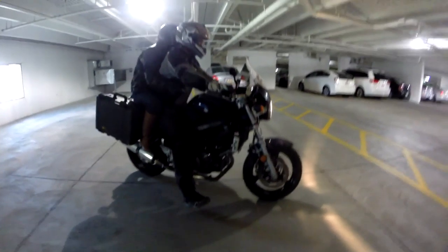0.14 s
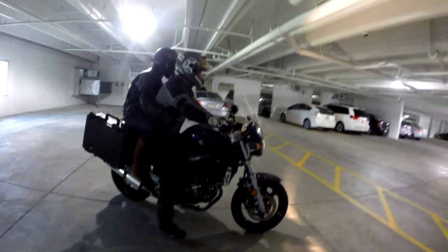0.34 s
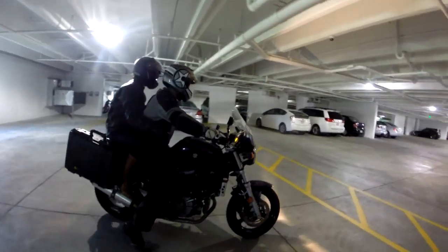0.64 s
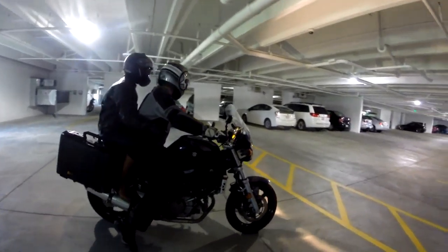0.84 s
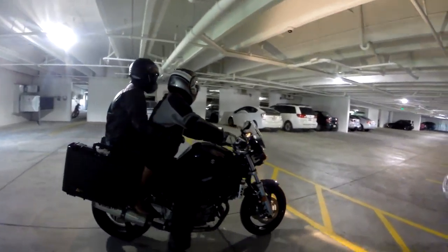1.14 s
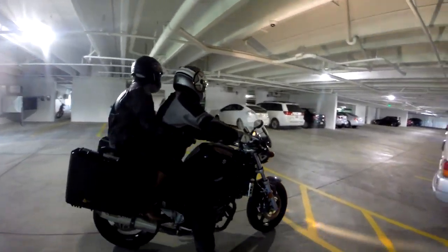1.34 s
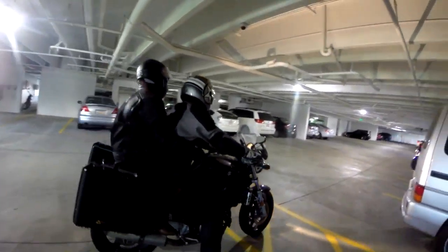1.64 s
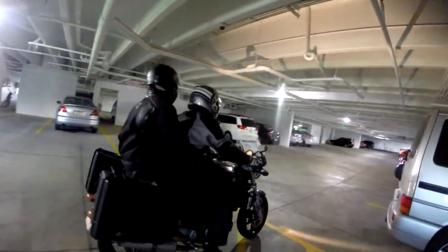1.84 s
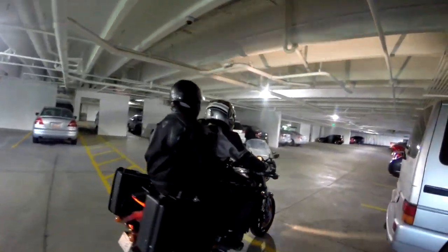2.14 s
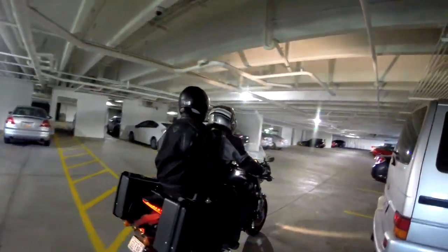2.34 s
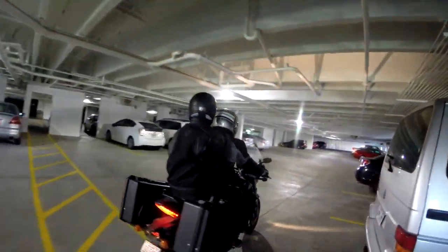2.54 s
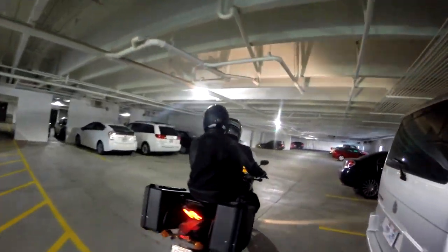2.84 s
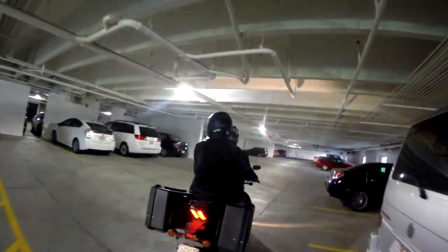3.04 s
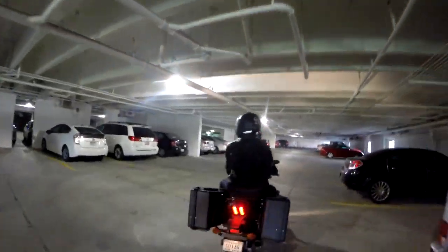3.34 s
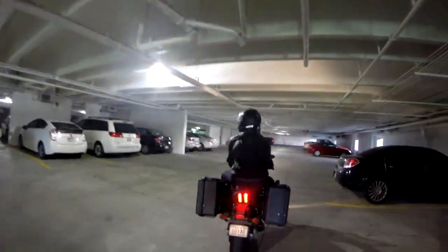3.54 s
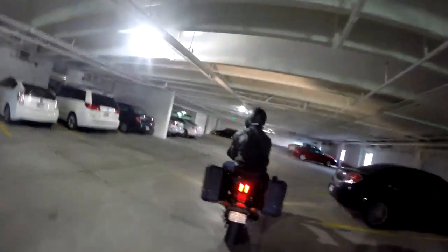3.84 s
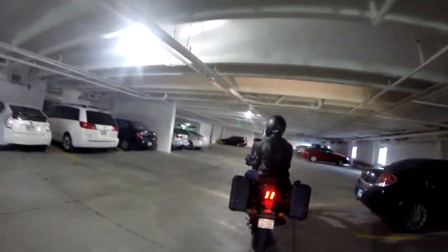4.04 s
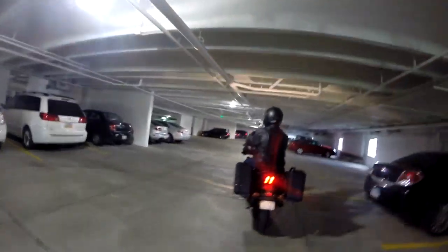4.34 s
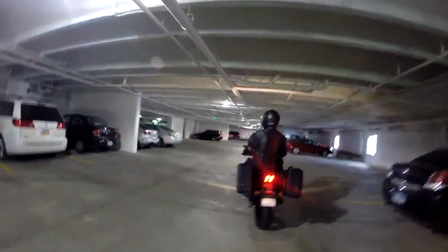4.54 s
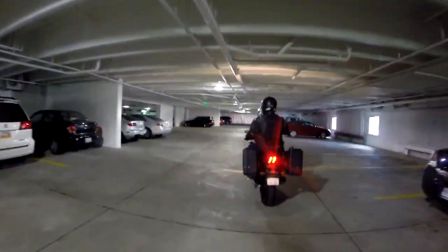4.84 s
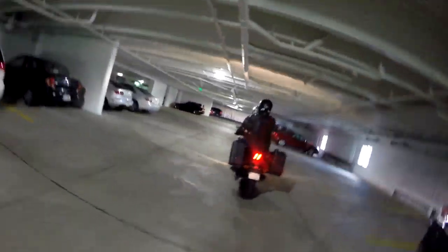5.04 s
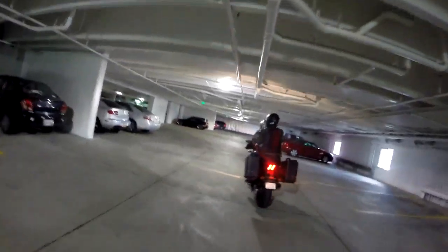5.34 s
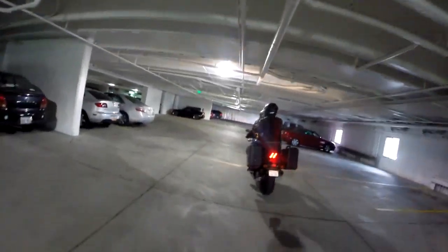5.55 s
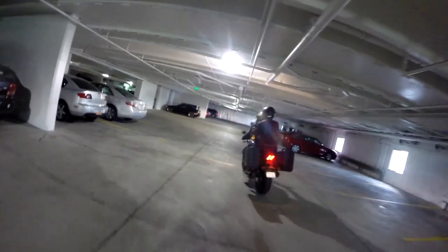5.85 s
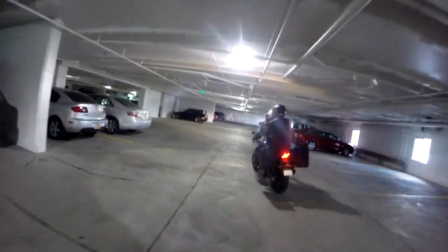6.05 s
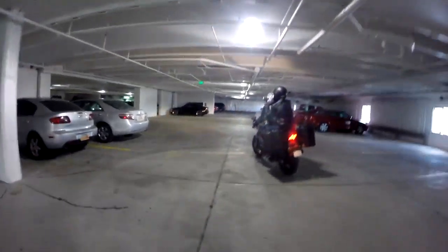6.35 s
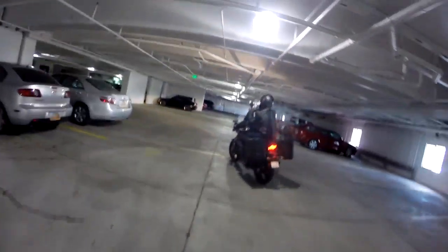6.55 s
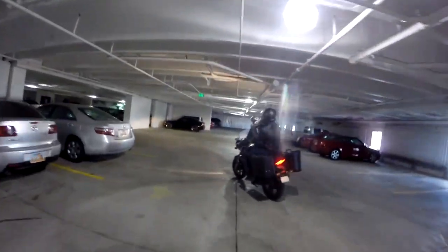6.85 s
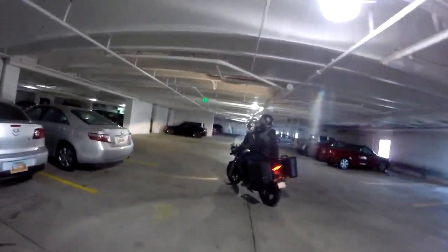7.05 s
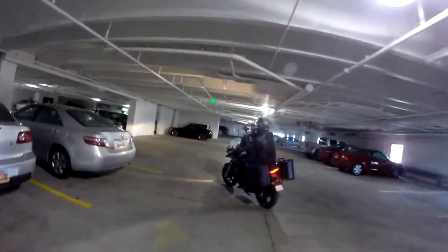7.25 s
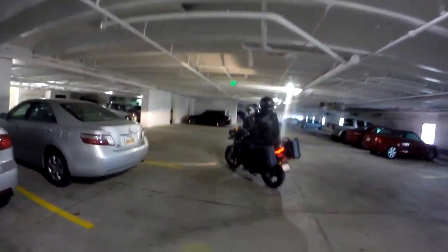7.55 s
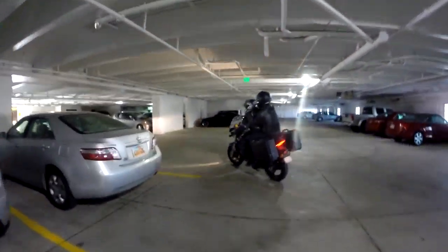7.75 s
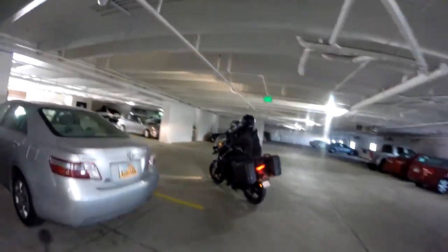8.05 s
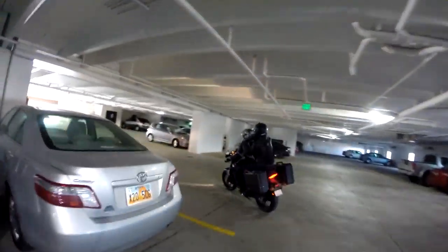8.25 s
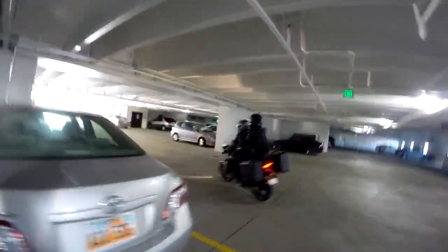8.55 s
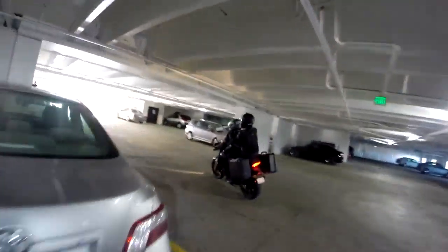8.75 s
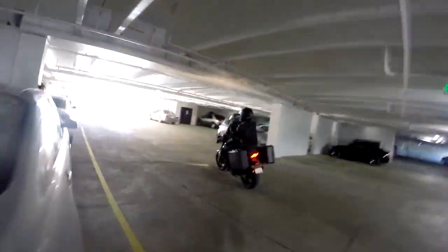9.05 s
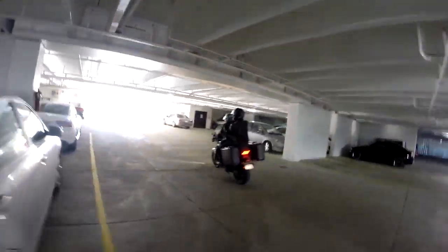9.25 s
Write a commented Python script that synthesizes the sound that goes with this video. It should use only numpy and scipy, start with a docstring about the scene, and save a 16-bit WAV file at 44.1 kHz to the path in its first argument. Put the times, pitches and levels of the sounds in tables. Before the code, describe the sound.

Close plastic clicks and a heavy thump on the camera open over a motorcycle's deep, uneven idle and ticking valves. The revs climb into a hoarse roar as it leaves, sink while coasting, then rise to the end, with low notes blooming off the concrete walls. A carried microphone is buffeted by soft, sub-bass gusts at each stride and clicks throughout.

```python
"""A V-twin motorcycle idles in a concrete garage: firing pulses boom, bark and roar over metal clatter.
From the start the camera carried after it is blown and handled: noise buffets, scrapes, knocks and bumps.
The bike pulls away as its revs climb, with faint rustles of handling from then on.
It coasts round a corner on falling revs, then speeds up again, a thin squeak of filtered noise
passing early in that second climb."""
import sys
import numpy as np
from scipy import signal
from scipy.fft import rfft, irfft
from scipy.io import wavfile
from scipy.ndimage import uniform_filter1d

SR = 44100
rng = np.random.default_rng(int(sys.argv[2]) if len(sys.argv) > 2 else 0)


def transcribe(u):
    """Save the signal u as a 16-bit wav file named by the first command-line argument.

    u: samples, shape (n,) or (channels, n), limited to [-1, 1]; the rate is SR.
    q: integer samples, one column per channel.
    """
    v = np.clip(np.atleast_2d(u).T, -1, 1)
    q = np.round(v * 32767).astype(np.int16)
    wavfile.write(sys.argv[1], SR, q)


N = 414099
TIME = np.arange(N) / SR

# engine speed, dipping as the clutch bites: time_s, speed_hz (four-stroke cycles a second)
ENGINE_SPEED = [(0, 13), (.45, 13.3), (.68, 13.5), (.86, 14.26), (1.45, 13.66), (1.65, 13.3), (1.9, 13.9),
                (2.55, 13.8), (2.76, 13.3), (3.1, 13.3), (3.5, 14.55), (3.75, 16.2), (4.05, 17.3),
                (4.45, 17.9), (5.0, 17.15), (5.55, 14.6), (6.1, 13.44), (7.1, 12.8), (7.75, 14.5),
                (8.1, 15.4), (8.6, 17.3), (9.1, 19.1), (9.39, 20.7)]
# throttle, as the strength of the firings against idling: time_s, throttle_db
THROTTLE = [(0, 1.5), (.9, 2), (3.2, 1.5), (4.0, 7), (4.3, 5.5), (4.75, 6.5), (5.35, 0.5), (6.05, -4.5),
            (6.7, 3.5), (7.15, 2), (7.7, 4.5), (9.0, 7), (9.39, 6.5)]
# how far the bike is from the camera: time_s, distance_m
BIKE_DISTANCE = [(0, 2.5), (3.2, 2.44), (4.3, 2.5), (5.0, 1.5), (5.4, 5), (6.8, 6.2), (8.5, 3.63),
                 (9.39, 3.6)]
# low tone of the exhaust: freq_hz, gain_db
BOOM_COLOUR = [(20, -14.5), (45, -5.5), (68, 2), (81, -1.5), (94, 1), (110, 3.5), (130, 4), (152, -7.5),
               (172, -11.5), (230, -29), (500, -82)]
# midrange of the exhaust: freq_hz, gain_db
BARK_COLOUR = [(100, -31), (180, -7), (220, -4), (275, 1.5), (335, -5), (375, -7.5), (430, -20.5),
               (520, -24.5), (700, -34.5), (980, -26.5), (1300, -33.5), (3000, -74)]
# open end of the silencer, roaring above the bark: freq_hz, gain_db
ROAR_COLOUR = [(250, -33.5), (350, -7), (408, 3), (465, -4), (530, -4), (600, -16), (700, -17), (1000, -47),
               (2000, -64.5)]
# the roar climbs with the throttle and as the pipe swings towards the camera: time_s, level_db
ROAR_LEVEL = [(0, -56.5), (1.4, -52.5), (1.7, -50.5), (2.25, -47.5), (2.6, -50), (2.9, -51), (3.3, -48),
              (3.85, -46), (4.3, -46), (4.72, -43.5), (4.92, -42), (5.15, -48), (5.6, -56), (6.3, -58),
              (7.1, -59), (7.7, -53), (8.4, -49.5), (8.9, -47.5), (9.39, -45)]
# metal of the engine: freq_hz, gain_db
METAL_COLOUR = [(300, 0.5), (750, 1.5), (1000, 1.5), (1250, -4.5), (1570, 2.5), (1830, -3), (2050, 3.5),
                (2450, 1.5), (2800, -3), (3000, -3), (3300, -6), (4650, -8.5), (4900, -7.5), (5050, -3.5),
                (5250, -8), (6400, -11), (8500, -22), (10100, -22), (12000, -25), (13500, -40)]
# exhaust harmonics swell and sink in standing waves of the garage:
# centre_s, harmonic (multiple of the engine speed), change_db, half_length_s
HARMONIC_SWELLS = [(0.602, 8, 7.5, 0.17), (1.16, 8, -11, 0.31), (1.155, 9, 10.5, 0.47),
                   (1.213, 11, 12, 0.46), (2.302, 8, 3, .35), (2.2, 5, 3, 1), (3.5, 8, 3.5, .25),
                   (4.25, 6, 7, 0.49), (4.797, 7, 11.5, 0.24), (5.55, 8, 0, .2), (6.2, 5, 0, 0.87),
                   (7.42, 9, 14.5, .15), (7.452, 8, 5, 0.17), (8.151, 8, 5.5, .22), (9.24, 6, 13, .2),
                   (8.9, 5, -10, 0.47)]
# reverberation of the garage: freq_hz, t60_s
GARAGE_DECAY = [(60, 3.44), (250, 1.2), (1000, 0.81), (4000, 1.2), (10000, 1.7)]
# air buffeting the microphone: freq_hz, gain_db
AIR_COLOUR = [(4, -49), (11, -9), (23, 4), (31, -4.5), (42, -14), (65, -26), (120, -29.5), (250, -52),
              (600, -69), (6000, -100)]
# steady air at the microphone, rising as the camera starts to move: time_s, level_db
DRAUGHT = [(0, -31), (.7, -26), (1.2, -35), (2.4, -27), (3.2, -27.5), (4.0, -20), (4.6, -17), (4.9, -23.5),
           (7, -25), (9.39, -24.5)]
# a gust from each stride or swing of the camera: peak_s, peak_db
STRIDE_GUSTS = [(.13, -19.5), (.36, -26.5), (.52, -19), (2.82, -18.5), (3.36, -23.5), (3.65, -17),
                (3.82, -18), (4.49, -10), (4.66, -13.5), (5.02, -12), (5.36, -15.5), (5.709, -14),
                (6.06, -16), (6.39, -12.5), (6.73, -19.5), (7.079, -16.5), (7.42, -18), (7.84, -16),
                (8.2, -17.5), (8.74, -13.5), (8.91, -15), (9.27, -14.5)]
# the case scrapes along its mount: centre_s, level_db, half_length_s
SCRAPES = [(0.01, -45, 0.02), (0.066, -47, 0.015), (0.135, -28, 0.012), (4.484, -43, 0.013),
           (4.56, -53, 0.011), (4.664, -49, 0.023), (4.746, -46, 0.01)]
# the case knocks on its mount: start_s, level_db (midrange, first 10 ms), extra_body_db, extra_edge_db
CASE_KNOCKS = [(0.0634, -46, 1, -4), (0.0799, -43, 6, -3), (0.0868, -33.5, 6.5, -3), (0.0923, -50, 15, -4),
               (0.1249, -31, 9, -3), (0.1277, -19, -2, -11.5), (0.1356, -32, 3, 0), (0.1427, -43, 2, -3),
               (.152, -50, 3, -6), (0.3118, -23.5, -7, -4), (0.403, -31, -2, -10), (0.4535, -35.5, 4, -34),
               (0.499, -46.5, 0, 15), (0.527, -29.5, -2, -16), (1.555, -34, 0, 8),
               (2.4077, -31.5, -12, 12.5), (2.8895, -33.5, -5, 11), (2.9442, -19, -7, 1),
               (3.5982, -35, -8, 19), (3.7036, -36.5, 14, -21), (3.773, -21, -8.5, 9.5),
               (3.7775, -37, -5, 11), (3.7948, -28.5, 4.5, 10), (3.933, -27.5, 7.5, 0),
               (4.003, -35, 7, -10), (4.017, -31, 9, -4), (4.041, -32.5, 4, -25),
               (4.0813, -18.5, -1.5, 9.5), (4.083, -31, 4, 6), (4.0898, -35.5, 25, -15),
               (4.249, -45.5, -4, -6), (4.334, -45, -4, 9), (4.4717, -26, 2.5, 2), (4.485, -31, -10, 1),
               (4.4894, -27.5, 16, -8), (4.547, -24, -11, 5), (4.552, -32.5, 3, 1), (4.5557, -45, 14, -7),
               (4.5736, -30, 10, -3), (4.6, -49, 2, 8), (4.638, -29.5, -1, 1), (4.6566, -32, 14, -10),
               (4.665, -41, 12, 0), (4.692, -46, 0, 10), (4.715, -44, 18, -10), (4.7415, -28.5, 8, -7),
               (4.7453, -43, 17, -12), (4.998, -29, -3, 6.5), (5.1328, -20, -7, 3), (5.3634, -35.5, -7, 8),
               (5.368, -27.5, -2, 7), (5.601, -35.5, -3, 2), (5.706, -32.5, 2.5, 20), (5.8044, -43, 3, -6),
               (5.876, -47, -1, 7), (5.8864, -36.5, -1, -28), (5.937, -36, 9, -25), (5.943, -50, 19, -15),
               (5.9987, -33, 3, -7), (6.0045, -47, 26, -8), (6.035, -46.5, -8, 13.5), (6.0466, -40, -8, -2),
               (6.0815, -31, -5.5, -19), (6.1738, -43, -6, 0), (6.304, -37, -6, 0), (6.3611, -25.5, -6, -8),
               (6.4094, -36.5, -5, 17.5), (6.571, -46, -1, 12), (6.609, -38.5, 0.5, 2),
               (7.1007, -43, -29, 16), (7.237, -41, -3, 0), (7.288, -28.5, -8, -5), (7.4753, -44, 19, 18),
               (7.5345, -33, 12, -6), (7.5563, -49, 0, 1), (7.7007, -31.5, -9, 1.5), (7.839, -46, -22, 16),
               (7.9377, -27.5, -7.5, 4), (8.055, -32, -4, 2), (8.14, -33.5, -3, -27),
               (8.4633, -36.5, -4, 6), (8.663, -30, -8, 7.5), (8.7237, -32, -0.5, 0),
               (8.8609, -22.5, -3, 11), (8.882, -40, 13, -5), (8.91, -47, 27, -5), (9.189, -43, -2, -2),
               (9.233, -38.5, -0.5, -2), (9.3192, -33.5, 4, -20)]
# colour of the plastic case: freq_hz, gain_db
CASE_COLOUR = [(80, 15.5), (300, -9), (430, 7), (590, 10), (740, -5.5), (900, -5.5), (1170, 5),
               (1350, -2.5), (1570, 2.5), (1800, -3), (2020, 2.5), (2500, -0.5), (2680, -6.5),
               (2880, -13.5), (3600, -14), (4150, -28.5), (4650, -26), (4950, -28), (5350, -21.5),
               (5900, -38.5), (6900, -44), (7500, -30.5), (8800, -71), (10000, -53), (10950, -46),
               (13000, -75)]
# faint ringing of the case: pitch_hz, level_db (against the peak of the click), t60_s
CASE_MODES = [(276, -16, 0.093), (413.4, -12.5, 0.044), (607, -19, 0.021), (789, -26.5, 0.08),
              (1695, -36.5, 0.17)]
# dull bumps on the camera body: start_s, height_db, length_s, direction (+1 or -1)
BODY_BUMPS = [(0.084, -20, 0.0023, 1), (0.1287, -7.5, 0.0019, 1), (0.1302, -6, 0.011, -1),
              (.1385, -14.5, 0.0072, 1), (3.701, 0.5, 0.0047, 1), (3.7039, -8, 0.0017, 1),
              (4.491, -17, 0.0016, 1), (4.5765, -13, 0.0035, 1), (4.658, -23, 0.0028, 1),
              (4.7425, -29, 0.003, 1)]
# brief high rustles of handling: centre_s, level_db, half_length_s
RUSTLES = [(4.149, -55, 0.13), (4.418, -55, 0.055), (4.93, -57, 0.071), (5.77, -54.5, 0.018),
           (7.17, -54, .02), (8.553, -55, 0.062), (9.25, -53, 0.055), (9.351, -52, 0.034)]
# colour of the rustles: freq_hz, gain_db
RUSTLE_COLOUR = [(800, -30), (2500, 6), (4500, 3.5), (6500, 4.5), (8500, -9), (12000, -13), (13500, -28)]

IDLE_RATE_HZ = 13.6  # four-stroke cycles a second
HUNT = .003  # rms share by which the speed wanders
BOOM_DB, BARK_DB, CLATTER_DB, HUM_DB = -35.5, -42.5, -50.5, -45.5  # at idle, at NEAR_M
BOOM_THROTTLE_SHARE, CLATTER_DB_PER_OCTAVE = 0.42, 4.5
NEAR_M, FALL_DB_PER_DOUBLING = 2, 2  # a small fall, as the concrete keeps the sound in
GUST_RISE_S, GUST_FALL_S = 0.031, 0.067
SLIPS_PER_S = 3100  # average density of the grains in a scrape
GRIP_DETUNE = .06  # share by which the changing grip shifts each mode from knock to knock
# after a knock the case falls back once: nominal delay, level and extra body against the knock
SETTLE_S, SETTLE_DB, SETTLE_BODY_DB = .011, -27, 20
# the shell rings as a push lets go, its level set against the push
BUMP_RING_HZ, BUMP_RING_DB, BUMP_RING_T60_S = 825, -24.5, 0.021
TREBLE_LIMIT_HZ = 13500


def gain_of(db):
    """Decibels to amplitude."""
    return 10 ** (np.asarray(db) / 20)


def evened(x):
    """Scales to rms 1."""
    return x / np.sqrt(np.mean(x ** 2) + 1e-20)


def steadied(x, size):
    """Holds the running rms at 1 over a window of samples."""
    return x / np.sqrt(abs(uniform_filter1d(x ** 2, size)) + 1e-12)


def read(points, hz):
    """Reads a frequency table along a log-frequency axis."""
    f, value = np.transpose(points)
    return np.interp(np.log(hz + 1), np.log(f + 1), value)


def curve(rows):
    """Turns the columns of a time table into one value a sample."""
    s, *columns = np.transpose(rows)
    return [np.interp(TIME, s, c) for c in columns]


def add(mix, s, sound):
    """Mixes a sound in at a time."""
    part = mix[max(round(s * SR), 0):][:len(sound)]
    part += sound[:len(part)]


def coloured(x, points, size=8192):
    """Minimum-phase filter with the given spectrum, so that no sound comes before its cause."""
    log_gain = np.log(gain_of(read(points, abs(np.fft.fftfreq(size, 1 / SR)))))
    response = np.fft.ifft(np.exp(np.conj(signal.hilbert(log_gain)))).real
    return signal.oaconvolve(x, response[:size // 2])[:len(x)]


def resonated_noise(x, hz, width_hz, passes):
    """Rings a sound through a narrow resonance, once or more."""
    b, a = signal.iirpeak(hz, hz / width_hz, SR)
    for _ in range(passes):
        x = signal.lfilter(b, a, x)
    return evened(x)


def drift(hz):
    """Slow chance wandering of rms 1, up to about the given rate."""
    spectrum = rfft(rng.standard_normal(N))
    slowing = 1 + (np.fft.rfftfreq(N, 1 / SR) / hz) ** 4
    return evened(irfft(spectrum / slowing, N))


def hump(s, rise_s, fall_s):
    """A smooth bell that reaches 1 at a time, with its own rise and fall."""
    out = np.zeros(N)
    near = slice(*np.searchsorted(TIME, [s - 4 * rise_s, s + 4 * fall_s]))
    t = TIME[near] - s
    out[near] = np.exp(-(t / np.where(t < 0, rise_s, fall_s)) ** 2)
    return out


def humps(rows):
    """Level envelope of a table of brief, symmetrical events."""
    return sum(gain_of(db) * hump(s, half_s, half_s) for s, db, half_s in rows)


def garage(x, wet_db, walk_s=2.398, count=3):
    """Direct sound plus dense reflections off concrete, which change as bike and camera move."""
    shape = (count, 2 * SR)
    echoes = rng.choice([-1., 1.], shape) * (rng.random(shape) < 1 / 20)
    echoes *= TIME[:2 * SR] > .008  # the first reflection has further to travel
    hz, t, bins = signal.stft(echoes, SR, nperseg=256)
    decay = gain_of(-60 * t / read(GARAGE_DECAY, hz)[:, None])
    tails = signal.istft(bins * decay, SR, nperseg=256)[1]
    room = np.zeros(N)
    for k, tail in enumerate(tails):
        # each set of reflections swells and fades in turn
        part = x * np.sqrt(2 / count) * np.sin(np.pi * (TIME / walk_s + k / count))
        running = np.concatenate([part[:SR], part])  # the room is already ringing
        room += signal.fftconvolve(running, tail / np.linalg.norm(tail))[SR:SR + N]
    direct_db = np.interp(TIME, [3, 6], [0, -6])  # the bike draws ahead
    return x * gain_of(direct_db) + gain_of(wet_db) * room


def firings(turns, second_db, rough):
    """Two cylinders at a right angle fire three eighths of a cycle apart, each blow a little different."""
    train = np.zeros(N)
    for offset, db in [(0, 0), (3 / 8, second_db)]:
        at = np.flatnonzero(np.diff(np.floor(turns - offset)))
        blows = np.exp(rough * rng.standard_normal(500))
        train[at] += gain_of(db) * blows[:len(at)]
    return train


def puffs(train, decay_s):
    """A short burst of turbulence after each blow: noise under a decaying envelope."""
    envelope = signal.lfilter([1], [1, -np.exp(-1 / (decay_s * SR))], train)
    return evened(envelope * rng.standard_normal(N))


def exhaust_hum(turns, speed, throttle_db, count=13, size=100):
    """Clean harmonics of the uneven firing order, weighted by the silencer and by standing waves."""
    out = np.zeros(N)
    for k in range(3, count):
        both_cylinders = 1 + np.exp(-2j * np.pi * k * 3 / 8)  # they reinforce or cancel
        swell_db = sum(db * hump(s, half_s, half_s)[::size]
                       for s, multiple, db, half_s in HARMONIC_SWELLS if round(multiple) == k)
        coarse_height = gain_of(read(BOOM_COLOUR, k * speed[::size]) + swell_db)
        height = np.interp(TIME, TIME[::size], coarse_height)
        tone = np.cos(2 * np.pi * k * turns + np.angle(both_cylinders))
        out += height * abs(both_cylinders) * tone
    return gain_of(HUM_DB + BOOM_THROTTLE_SHARE * throttle_db) * out


def intake(pulses, speed, top_db=-56, top_rate_hz=19.5, db_per_rate=2.0):
    """The airbox resonates with each puff and howls softly as the revs climb."""
    howl = resonated_noise(puffs(pulses, decay_s=0.016), hz=1400, width_hz=210, passes=2)
    return gain_of(top_db - db_per_rate * np.maximum(top_rate_hz - speed, 0)) * howl


def exhaust_voice(pulses, colour, puff_db, decay_s, wet_db):
    """Firing pulses and their turbulence, shaped by the silencer and heard in the garage."""
    blast = evened(pulses) + gain_of(puff_db) * puffs(pulses, decay_s)
    return garage(coloured(blast, colour), wet_db)


def engine_clatter(turns):
    """Valves tick four times a cycle, in uneven pairs, over the steady hiss of the gears."""
    valves = firings(2 * turns + .3, second_db=-4.5, rough=0.37)
    noise = puffs(valves, decay_s=0.0063) + gain_of(6.5) * rng.standard_normal(N)
    return garage(coloured(noise, METAL_COLOUR), wet_db=-10.5)


def motorcycle():
    """One hunting crank drives every engine part; revs and throttle set most levels, a curve sets the roar."""
    (speed,), (throttle_db,) = curve(ENGINE_SPEED), curve(THROTTLE)
    (distance_m,), (roar_db,) = curve(BIKE_DISTANCE), curve(ROAR_LEVEL)
    turns = np.cumsum(speed * (1 + HUNT * drift(4.3))) / SR
    pulses = firings(turns, second_db=-1.5, rough=0.17)

    boom = garage(coloured(pulses, BOOM_COLOUR), wet_db=10)
    bark = exhaust_voice(pulses, BARK_COLOUR, puff_db=-10, decay_s=0.013, wet_db=1)
    roar = exhaust_voice(pulses, ROAR_COLOUR, puff_db=-6, decay_s=0.02, wet_db=3)
    clatter = engine_clatter(turns)

    boom_db = BOOM_DB + BOOM_THROTTLE_SHARE * throttle_db
    bark_db = BARK_DB + throttle_db
    clatter_db = CLATTER_DB + CLATTER_DB_PER_OCTAVE * np.log2(speed / IDLE_RATE_HZ)
    engine = exhaust_hum(turns, speed, throttle_db)
    for db, part in [(boom_db, boom), (bark_db, bark), (clatter_db, clatter)]:
        engine += gain_of(db) * steadied(part, size=16000)
    engine *= gain_of(-FALL_DB_PER_DOUBLING * np.log2(distance_m / NEAR_M))
    return engine + gain_of(roar_db) * steadied(roar, size=16000) + intake(pulses, speed)


def buffeting():
    """Lumpy, very low pressure swings: a steady draught and a gust with every stride, summed as power."""
    draught_db, = curve(DRAUGHT)
    power = gain_of(draught_db) ** 2
    for s, db in STRIDE_GUSTS:
        power += gain_of(db) ** 2 * hump(s, GUST_RISE_S, GUST_FALL_S)
    air = coloured(rng.standard_normal(N), AIR_COLOUR, size=32768)
    return np.sqrt(power) * steadied(air, size=4000)


def scrapes():
    """The mount slips in random grains, which sound through the case."""
    slips = rng.standard_normal(N) * (rng.random(N) < SLIPS_PER_S / SR)
    return humps(SCRAPES) * evened(coloured(slips, CASE_COLOUR))


def knock(body_db, edge_db, size=4096):
    """The case chatters, strikes and springs back; extra body rattles longer, extra edge is brighter."""
    t = TIME[:size]
    rattle_s = 0.0031 * gain_of(0.33 * body_db)
    force = 0.079 * rng.standard_normal(size) * np.exp(-t / rattle_s)
    strike_s, rebound_s = 0.000422, 0.000408  # a light touch comes first, then the blow and its rebound
    force += 0.63 * np.sinc((t - strike_s) * SR)
    force -= 0.78 * np.sinc((t - strike_s - rebound_s) * SR)
    click = coloured(force, CASE_COLOUR, size=2048)

    grips = 1 + GRIP_DETUNE * rng.uniform(-1.11, 1, len(CASE_MODES))
    ring = sum(gain_of(db - 60 * t / t60) * np.sin(2 * np.pi * hz * grip * t)
               for (hz, db, t60), grip in zip(CASE_MODES, grips))

    # tone of the contact: freq_hz, gain_db
    contact = [(440, body_db), (620, 0.56 * body_db), (900, 0),
               (1200, -0.08 * edge_db), (1800, 0.14 * edge_db), (2500, 0.57 * edge_db),
               (3600, 0.62 * edge_db), (4600, 1.43 * edge_db), (7000, 0.97 * edge_db)]
    sound = coloured(click + abs(click).max() * ring, contact, size=2048)
    # level it by the midrange of its first 10 ms
    middle = signal.sosfilt(signal.butter(2, [750, 2700], "band", fs=SR, output="sos"), sound)
    return sound / np.sqrt(np.mean(middle[:SR // 100] ** 2))


def case_knocks():
    """Sharp knocks of the case, each falling back once, weaker and softer."""
    out = np.zeros(N)
    delays = SETTLE_S * rng.uniform(0.51, 1.4, len(CASE_KNOCKS))
    for (s, db, body_db, edge_db), delay_s in zip(CASE_KNOCKS, delays):
        add(out, s, gain_of(db) * knock(body_db, edge_db))
        add(out, s + delay_s, gain_of(db + SETTLE_DB) * knock(body_db + SETTLE_BODY_DB, edge_db))
    return out


def body_bumps():
    """Dull one-sided pushes on the camera body, with a weak recoil and a short ring of the shell."""
    out = np.zeros(N)
    t = TIME[:SR // 10]
    for s, db, length_s, direction in BODY_BUMPS:
        phase = np.arange(0, 1, 1 / (length_s * SR))
        push = np.sign(direction) * gain_of(db) * np.sin(np.pi * phase) ** 2.42
        add(out, s, -push)
        add(out, s + length_s, 0.068 * push)
        ring_gain = gain_of(db + BUMP_RING_DB - 60 * t / BUMP_RING_T60_S)
        add(out, s + 0.7 * length_s, ring_gain * np.sin(2 * np.pi * BUMP_RING_HZ * t))
    return out


def rustles():
    """Short swells of high noise as the camera shifts in the hand."""
    return humps(RUSTLES) * evened(coloured(rng.standard_normal(N), RUSTLE_COLOUR))


def squeak(s=8.17, half_s=0.17, db=-70):
    """A faint, thin squeak, probably a brake: noise through one narrow resonance."""
    tone = resonated_noise(rng.standard_normal(N), hz=7380, width_hz=60, passes=1)
    return gain_of(db) * hump(s, half_s, half_s) * tone


def scene():
    """The bike in the garage and the noises of the moving camera, as one channel."""
    camera = buffeting() + scrapes() + case_knocks() + body_bumps() + rustles()
    return (motorcycle() + camera + squeak())[None]


def record(dry):
    """A soft ceiling just under full scale, then the treble limit."""
    limited = dry / (1 + abs(dry / .95) ** 6) ** (1 / 6)
    lowpass = signal.firwin(255, TREBLE_LIMIT_HZ, window=("kaiser", 9), fs=SR)
    return signal.oaconvolve(limited, lowpass[None], "same")


dry = scene()
out = record(dry)
transcribe(out)
```